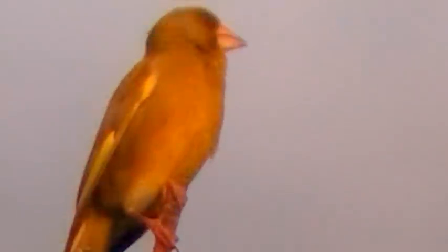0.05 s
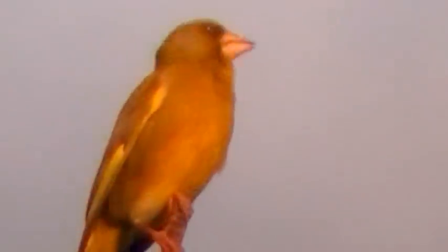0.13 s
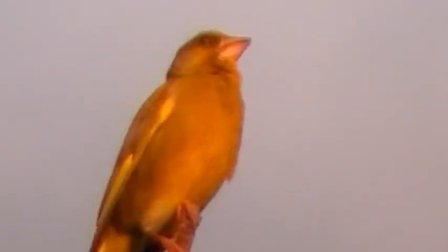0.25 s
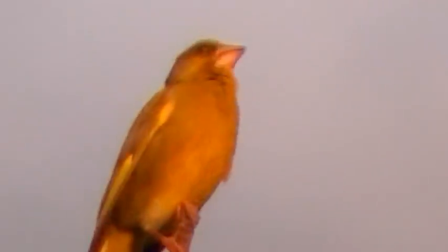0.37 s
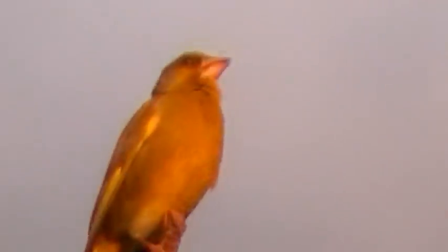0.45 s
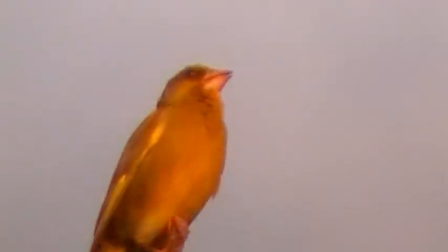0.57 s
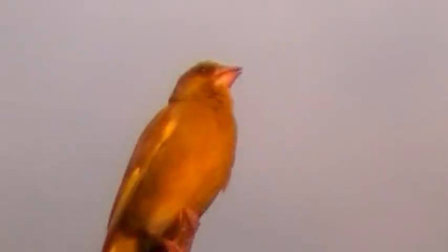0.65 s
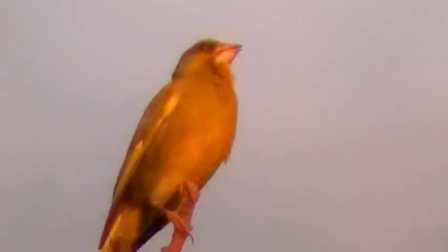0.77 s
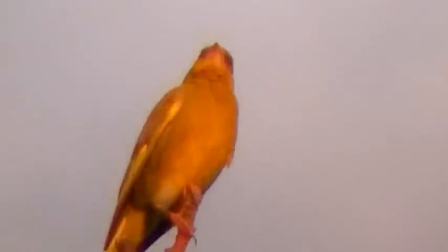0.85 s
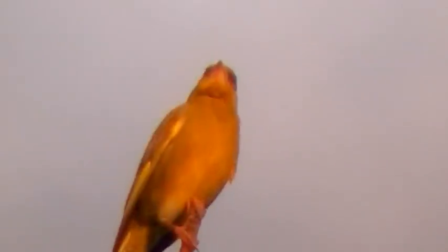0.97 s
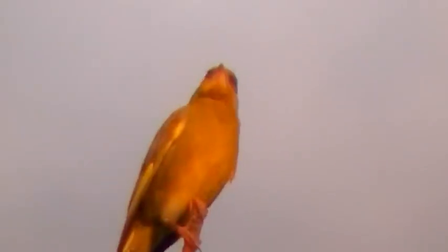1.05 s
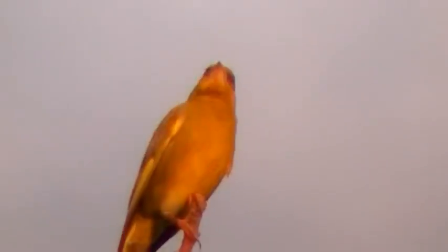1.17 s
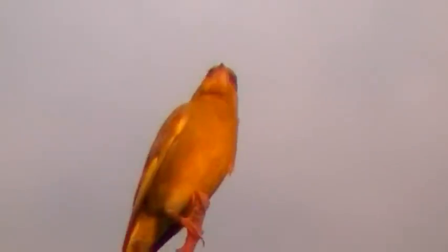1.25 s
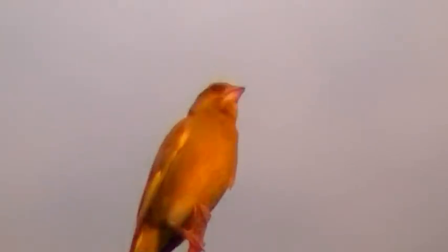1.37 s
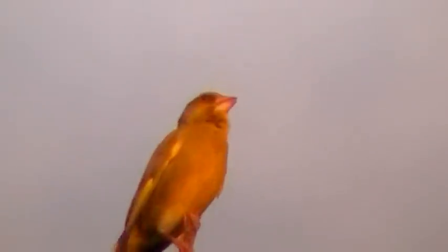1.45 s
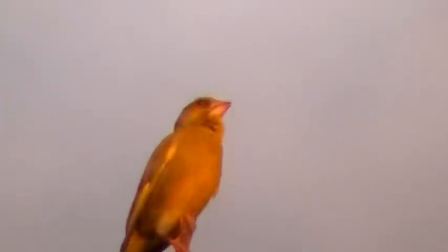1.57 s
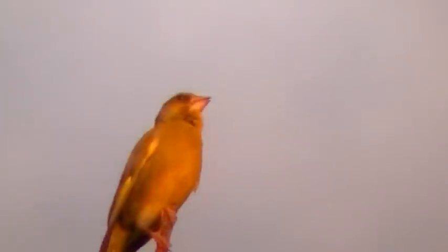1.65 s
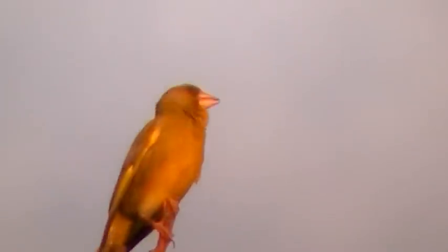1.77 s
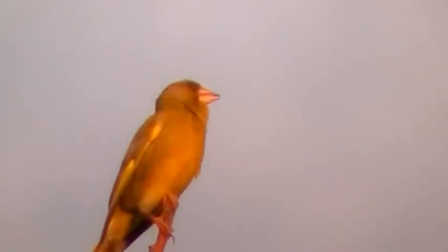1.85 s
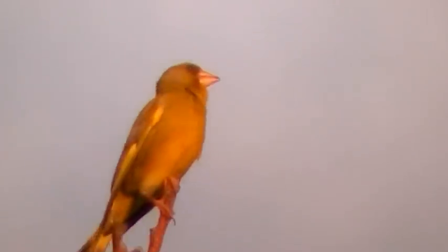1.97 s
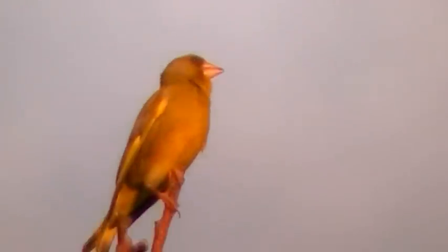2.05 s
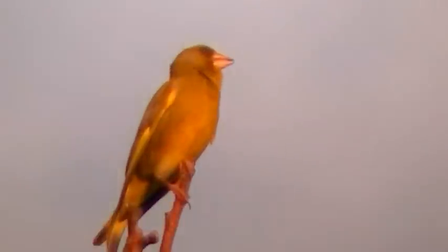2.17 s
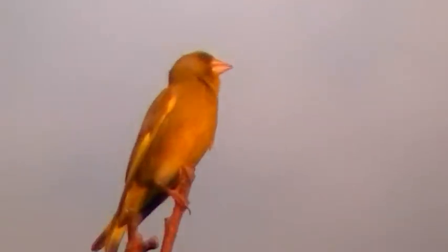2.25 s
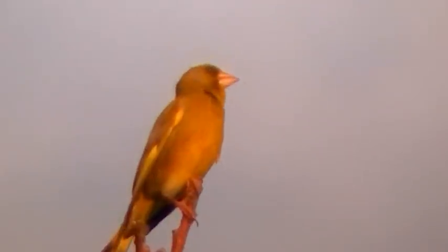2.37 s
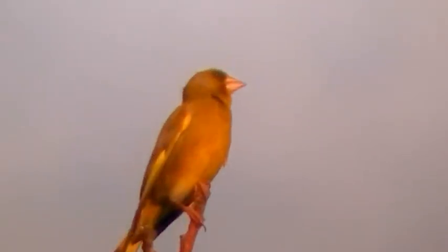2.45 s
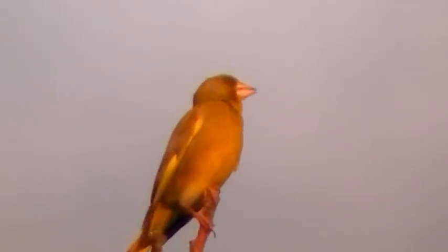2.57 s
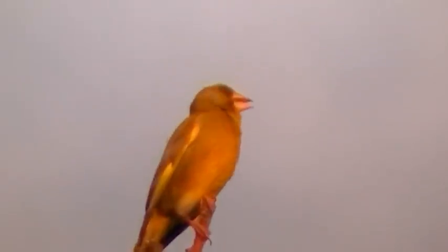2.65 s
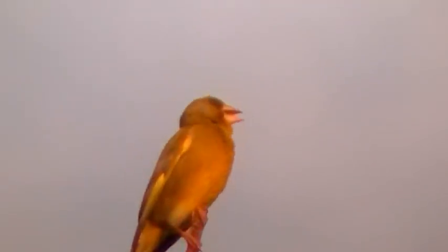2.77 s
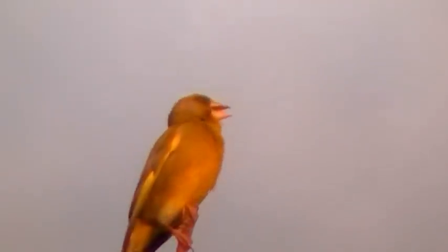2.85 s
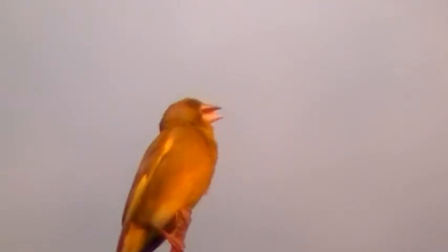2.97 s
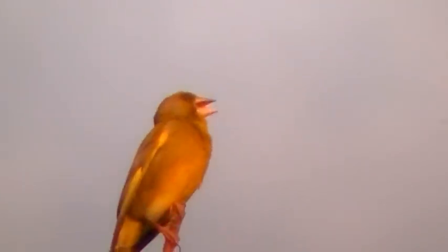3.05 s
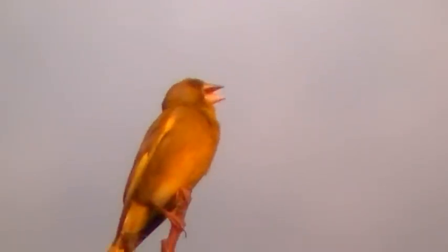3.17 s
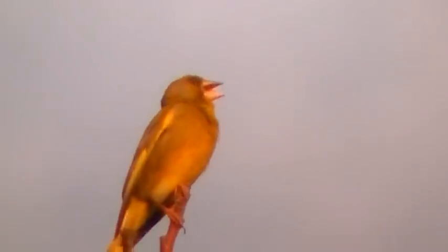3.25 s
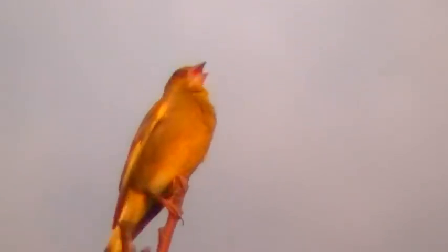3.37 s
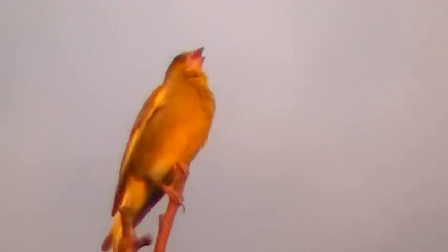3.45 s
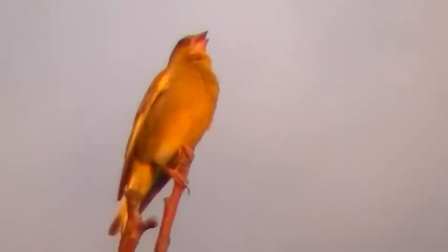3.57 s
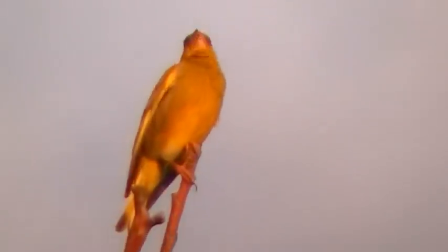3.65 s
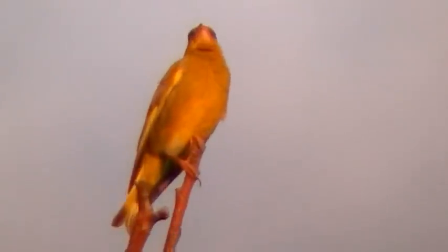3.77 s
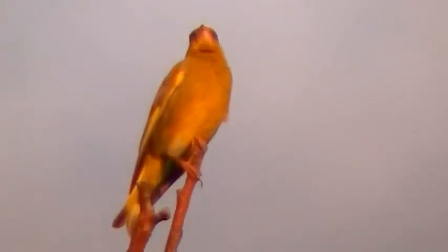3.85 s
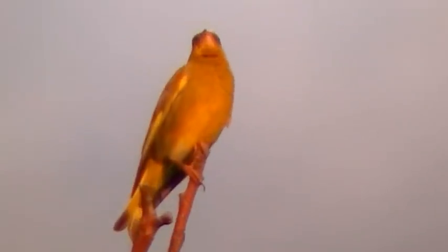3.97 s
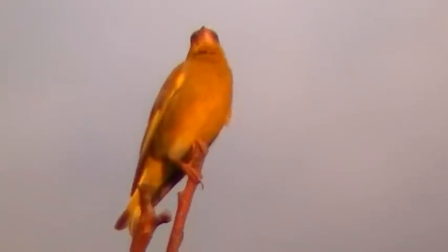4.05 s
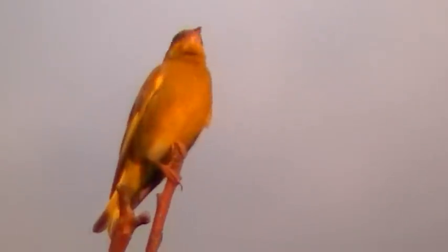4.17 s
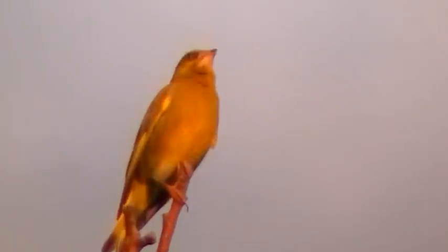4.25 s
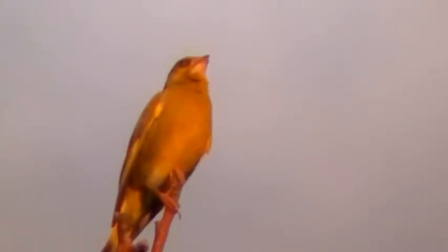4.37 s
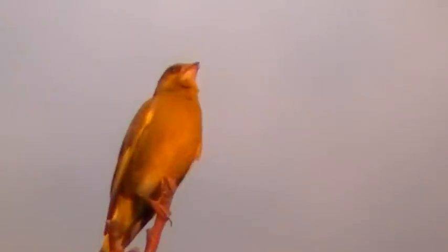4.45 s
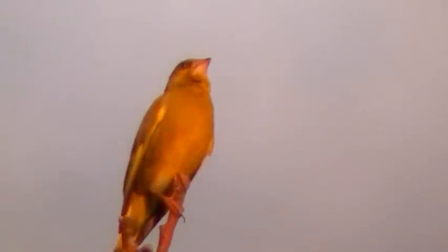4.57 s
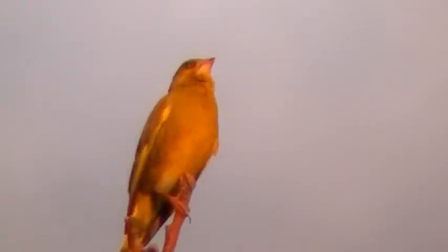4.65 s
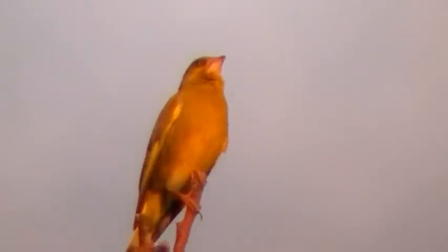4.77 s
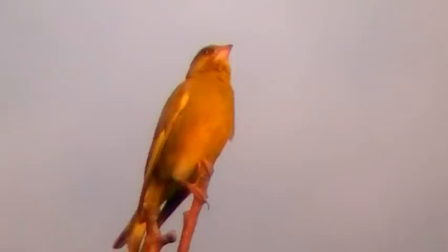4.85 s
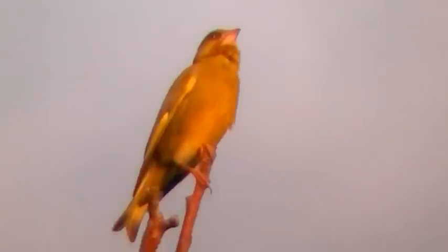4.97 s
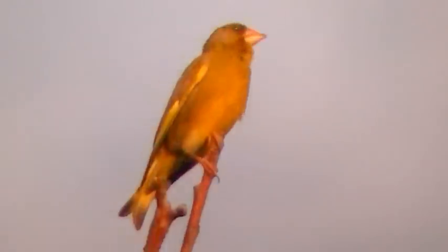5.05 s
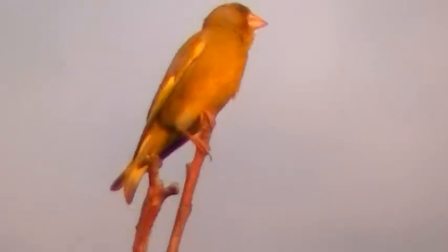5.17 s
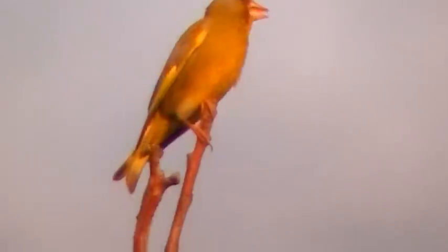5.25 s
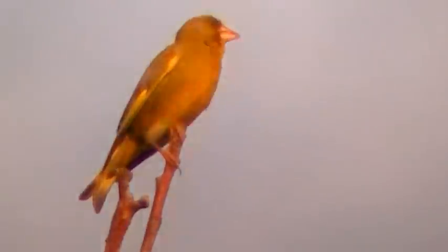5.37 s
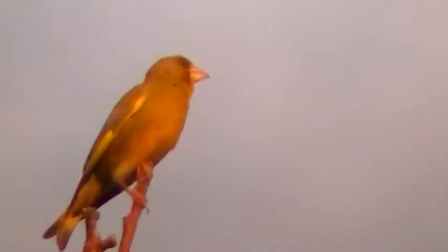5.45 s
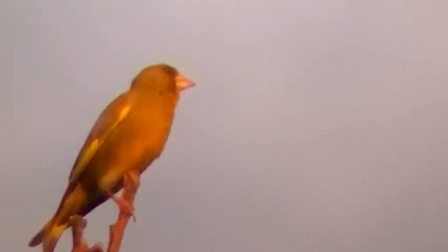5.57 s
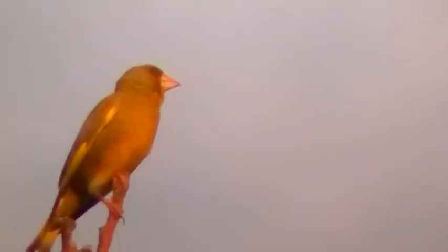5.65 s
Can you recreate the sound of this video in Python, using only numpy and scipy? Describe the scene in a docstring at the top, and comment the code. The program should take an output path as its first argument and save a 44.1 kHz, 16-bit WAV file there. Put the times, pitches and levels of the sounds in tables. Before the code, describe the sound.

A greenfinch close to the microphone gives thirteen quick chirped notes, rests, then ten longer falling whistles with a single sharp tick among them. A brief high whistle breaks into a one-second raspy, buzzing wheeze. Later come eight plunging notes, gently fading. Quick reflections and a short scattered tail surround the song. Behind are a quiet wide outdoor rush, a distant murmur swelling mid-way, and far-off rough bird chatter towards the end.

```python
"""A faint outdoor rush is heard first; then a greenfinch sings three trills of falling notes and one long wheeze.
Its notes are gliding whistles with weak overtones; the wheeze is a sinking whistle warbled about 119 times a second.
Nearby surfaces throw the song back within milliseconds, as delayed copies and a fading scatter of noise.
Far-off chatter is made of short rough whistles, a dry click is one pulse with a faint ring, and a second bird's
thin call leaps up and slides down. The rush and its distant swells are shaped noise."""
import sys
import numpy as np
from scipy import signal
from scipy.fft import rfft, irfft
from scipy.io import wavfile

SR = 44100
rng = np.random.default_rng(int(sys.argv[2]) if len(sys.argv) > 2 else 0)


def bounce(signal):
    """Save signal as a 16-bit WAV file at the path given by the first command-line argument."""
    frames = np.transpose(np.atleast_2d(signal))
    limited = np.clip(frames, -1, 1)
    pcm = np.round(limited * 32767).astype(np.int16)
    wavfile.write(sys.argv[1], SR, pcm)


N = 252252  # length of the scene in samples
# Levels in dB are relative: they add up along the way to the final sound.


def undb(db):
    """Turn decibels into a plain gain."""
    return 10 ** (np.asarray(db) / 20)


def unit(x):
    """Scale a sound to an average (rms) strength of 1."""
    return x / np.sqrt(np.mean(x ** 2))


def gain_at(hz, points):
    """Gain at each frequency of a (frequency [Hz], level [dB]) curve, joined on a log-frequency axis."""
    f, db = np.transpose(points)
    return undb(np.interp(np.log(np.maximum(hz, 1)), np.log(f), db))


def noise(points, size):
    """Random hiss of rms 1, coloured by a (frequency [Hz], level [dB]) curve."""
    spectrum = rfft(rng.standard_normal(size))
    colour = gain_at(np.fft.rfftfreq(size, 1 / SR), points)
    return unit(irfft(spectrum * colour, size))


def wander(rate, size):
    """Chance drift around 0: a new random value `rate` times a second, joined by straight lines."""
    steps = np.arange(size) * rate / SR
    return np.interp(steps, np.arange(4096), rng.standard_normal(4096))


def trace(rows):
    """Start time of a curve table, and its other columns drawn out sample by sample."""
    s, *columns = np.transpose(rows)
    t = np.arange(s[0], s[-1], 1 / SR)
    return s[0], [np.interp(t, s, c) for c in columns]


def add(track, s, x):
    """Mix sound x into the track from time s, in seconds."""
    i = max(int(s * SR), 0)
    track[i:i + len(x)] += x[:max(N - i, 0)]


# How strongly the throat and open beak pass the overtones: (frequency [Hz], level [dB])
THROAT_FILTER = [(5000, -16), (5800, -26.5), (6400, -20), (7100, -25), (7800, -18), (8900, -25),
                 (9800, -23.5), (12000, -24.5), (13200, -25), (14200, -35), (15500, -44)]


def syrinx(hz, db, overtone_db, throb_db=0, fourth_db=-3):
    """The bird's voice box: a nearly pure whistle that may throb, with weak overtones let through by the throat."""
    phase = 2 * np.pi * np.cumsum(hz) / SR
    tone = undb(throb_db) * np.sin(phase)  # only the fundamental throbs
    for k, db_k in zip(range(2, 5), (0, -1, fourth_db)):
        audible = k * hz < SR / 2
        strength = undb(overtone_db + db_k) * gain_at(k * hz, THROAT_FILTER) * audible
        tone += strength * np.sin(k * phase)
    fade = signal.windows.tukey(len(hz), min(0.0038 * SR / len(hz), 1))  # both end fades together: 3.8 ms
    return np.sqrt(2) * tone * undb(db) * fade


# Colour of the outdoor rush, alike on both sides: (frequency [Hz], level [dB per Hz])
RUSH_MID = [(15, -37), (25, -15.5), (133, -10), (183, -6.5), (253, -7), (322, -6.5), (389, -5.5),
            (457, -3.5), (871, -7), (2060, -11), (2630, -13), (3170, -12.5), (4870, -20), (5730, -19),
            (15500, -37)]
# Colour of the rush that is opposite on the two sides: (frequency [Hz], level [dB per Hz])
RUSH_SIDE = [(15, -16), (25, -18), (183, -3.5), (305, -6), (399, -5.5), (582, -7.5), (871, -12),
             (1050, -12), (1170, -13.5), (1490, -14), (3440, -22), (4500, -28), (8130, -31), (10100, -32.5),
             (15500, -46)]
RUSH_MID_DB, RUSH_SIDE_DB = -61.5, -57.5
# Swells of the distant murmur:
# (peak time [s], rise time [s], fall time [s], middle-range level [dB], low rumble level [dB])
MURMUR_SWELLS = [(3.201, 0.4, 0.89, -58.5, -81), (5.48, 0.13, 0.096, -56, -61)]
MURMUR_DB, RUMBLE_DB = -69, -78  # the steady part, below the swells


def outdoors(flicker_db=1.0, hiss_db=-75):
    """Open air: a flickering rush of noise, wide in the bass, with distant swells and a thin high hiss."""
    mid = undb(RUSH_MID_DB + flicker_db * wander(4.9, N)) * noise(RUSH_MID, N)
    side = undb(RUSH_SIDE_DB + flicker_db * wander(5.03, N)) * noise(RUSH_SIDE, N)
    t = np.arange(N) / SR
    middle, low = undb(MURMUR_DB), undb(RUMBLE_DB)
    for s, rise, fall, middle_db, low_db in MURMUR_SWELLS:
        swell = np.exp(-((t - s) / np.where(t < s, rise, fall)) ** 2)
        # hypot adds the strengths as energies
        middle = np.hypot(middle, undb(middle_db) * swell)
        low = np.hypot(low, undb(low_db) * swell)
    murmur_colour = [(100, -10), (450, -13), (850, 5.0), (1400, -3.5), (2500, -58), (8000, -64)]
    rumble_colour = [(60, -38), (230, -12.5), (500, -27), (3000, -56)]
    # separate noise for the left and right side
    murmur = np.array([noise(murmur_colour, N) for _ in range(2)])
    rumble = np.array([noise(rumble_colour, N) for _ in range(2)])
    hiss = undb(hiss_db) * noise([(4300, -9), (4750, 8), (4950, 6.5), (5250, -36)], N)
    return mid + side * np.array([[1], [-1]]) + middle * murmur + low * rumble + hiss


def trill(shape, notes, overtone_db, fourth_db, effort=0.24):
    """One falling note repeated, never quite alike; a louder note is richer in overtones."""
    out = np.zeros(N)
    _, (hz, db) = trace(shape)
    loudest = max(row[2] for row in notes)
    for s, ratio, note_db in notes:
        pitch = hz * ratio * (1 + .005 * wander(200, len(hz)))
        richness_db = overtone_db + effort * (note_db - loudest)
        add(out, s, syrinx(pitch, db + note_db, richness_db, fourth_db=fourth_db))
    return out


# Shape of the low note: (time into the note [s], pitch [Hz] before the ratio below, level [dB])
PIP_SHAPE = [(0, 3550, -16), (.004, 3640, -5.5), (.008, 3240, 1), (.012, 2900, -7), (.018, 2790, -11.5)]
# Where it is sung: (time [s], pitch ratio, level [dB])
PIP_NOTES = [(.094, 1.023, -38.5), (1.4517, 0.96, -32), (3.782, 0.95, -50), (4.018, 0.93, -48.5),
             (4.107, 0.98, -36.5)]


def pips():
    """Soft, low notes that lead into the trills, from the same whistling voice."""
    return trill(PIP_SHAPE, PIP_NOTES, overtone_db=-1, fourth_db=-9)


def tail(t60, onset_s, treble_db, side_db):
    """Scattered sound: noise that builds up and dies by 60 dB in t60 seconds, a little different on each side."""
    t = np.arange(SR) / SR
    fall = np.exp(-np.log(1000) * t / t60) * np.clip(t / onset_s, 0, 1) ** 2
    colour = [(500, 0), (4800, 0), (7500, treble_db), (14000, 2 * treble_db)]
    mid, side = (noise(colour, SR) * fall for _ in range(2))
    pair = mid + undb(side_db) * side * np.array([[1], [-1]])
    song_band = slice(2500, 4500)  # Hz, as the noise lasts one second
    # average gain of 1 where the song lies
    return pair / np.sqrt(np.mean(abs(rfft(pair)[:, song_band]) ** 2))


# Echoes off nearby surfaces: (delay time [s], level [dB])
NEAR_ECHOES = [(.00234, -4), (.0036, -4), (.00479, -7), (.00684, 5), (.00789, -3), (.01031, -10),
               (.01321, -9), (.01598, -9), (.01901, -10), (.02123, -13), (.02533, -11)]


def surroundings(x, scatter_db, far_db, dull_hz=6500):
    """Direct sound, then delayed copies duller in the treble, a quick scatter and a longer tail."""
    hz = np.fft.rfftfreq(SR, 1 / SR)
    # each delay is a turn of phase that grows with frequency
    near = sum(undb(db) * np.exp(-2j * np.pi * hz * s) for s, db in NEAR_ECHOES)
    near = near / (1 + (hz / dull_hz) ** 4)
    scatter = tail(t60=0.19, onset_s=0.008, treble_db=-5.0, side_db=-8.0)
    far = tail(t60=0.33, onset_s=0.071, treble_db=-35.0, side_db=-10.0)
    response = irfft(1 + near) + undb(scatter_db) * scatter + undb(far_db) * far
    return undb(-6.5) * signal.fftconvolve(x[None], response, axes=1)[:, :N]


def phrase(starts, peak_s, peak_db, fade_db_per_s, first_db=0, sharp=0, settle_s=1):
    """Notes (time [s], pitch ratio, level [dB]) that may start soft or sharp and get softer away from a peak."""
    s = np.array(starts)
    ratio = 1 + sharp * np.maximum(1 - (s - s[0]) / settle_s, 0)
    db = peak_db - fade_db_per_s * abs(s - peak_s) + first_db * (s == s[0])
    return np.transpose([s, ratio, db])


# Shape of a first-trill note: (time into the note [s], pitch [Hz], level [dB])
CHIP_SHAPE = [(0, 4330, -1.5), (.003, 3930, -2), (.006, 3520, -1), (.0087, 3130, -2.5), (.011, 2920, -6),
              (.016, 2860, -16)]
# When its notes start: (time [s])
CHIP_STARTS = [.1537, .217, .281, .345, .4114, .472, .536, .599, .662, .727, .792, .857, .9245]


def chips():
    """First trill: short whistles falling in pitch, swelling to a peak and easing off."""
    notes = phrase(CHIP_STARTS, peak_s=0.67, peak_db=-29.0, fade_db_per_s=7, first_db=-2.5)
    return trill(CHIP_SHAPE, notes, overtone_db=0.5, fourth_db=-2.5)


def far_call(length, hz, db, rough, rasp_db=3):
    """One call of a distant bird: a whistle unsteady in pitch and level."""
    size = int(length * SR)
    pitch = hz * (1 + rough * wander(1100, size))
    call = syrinx(pitch, db + rasp_db * wander(284, size), -6)
    return call * signal.windows.tukey(size, .5)


# Bouts of far-off chirps: (start time [s], end time [s], rate [chirps per s], chirp length [s],
# middle pitch [Hz], middle level [dB], roughness [share of the pitch])
CHIRP_BOUTS = [(1.248, 1.54, 22, 0.019, 2138, -65.5, 0.013), (2.297, 2.94, 10.6, 0.029, 2432, -64, .15),
               (4.03, 4.6, 2.55, 0.065, 1337, -65.5, 0.075), (5.01, 5.4, 3.8, 0.023, 1390, -59.5, 0.068),
               (5.027, 5.3, 13.5, 0.036, 2673, -61, 0.118)]
# Harsh calls of a distant bird: (time [s], length [s], level [dB])
HARSH_CALLS = [(4.954, 0.1, -57), (5.123, 0.11, -58), (5.354, 0.12, -56.5), (5.526, .11, -57)]
HARSH_HZ, HARSH_ROUGH = 2305, 0.1556  # middle pitch; roughness as a share of it


def chatter(pitch_spread=0.019, spread_db=2.0):
    """Distant birds: bouts of whistled chirps that each differ a little, and a few calls made harsh by jitter."""
    out = np.zeros(N)
    for s, length, db in HARSH_CALLS:
        add(out, s, far_call(length, HARSH_HZ, db, HARSH_ROUGH))
    for start, end, rate, length, hz, db, rough in CHIRP_BOUTS:
        for s in np.arange(start, end, 1 / rate):
            higher, louder = rng.standard_normal(2)
            pitch = hz * (1 + pitch_spread * higher)
            add(out, s, far_call(length, pitch, db + spread_db * louder, rough))
    return out


# Shape of a second-trill note: (time into the note [s], pitch [Hz] once settled, level [dB])
TEW_SHAPE = [(0, 4290, -9.5), (.004, 3635, -3.5), (.007, 3403, -1.5), (.015, 3414, -6), (.020, 3100, -1.5),
             (.0235, 2912, -10), (.026, 2650, -13)]
# When its notes start: (time [s])
TEW_STARTS = [1.5167, 1.5913, 1.665, 1.7431, 1.819, 1.8935, 1.97, 2.0575, 2.1446, 2.2306]


def tews():
    """Second trill: longer falling whistles that begin sharp and settle in pitch."""
    notes = phrase(TEW_STARTS, peak_s=2.05, peak_db=-34, fade_db_per_s=3.0, sharp=0.1123, settle_s=.31)
    return trill(TEW_SHAPE, notes, overtone_db=1.5, fourth_db=-14)


# Colour of the click: (frequency [Hz], level [dB])
CLICK_SPECTRUM = [(200, -22), (500, -16), (900, 0), (1800, 2.5), (3200, -6), (5200, -23), (6500, -17),
                  (8600, -20), (10000, -30), (15000, -52)]
CLICK_S, CLICK_DB = 1.7868, -25  # time; peak level of the pulse


def click(ring_db=-30, ring_t60=0.1):
    """A dry tick close to the microphone: one pulse with its energy at the front, and a faint dying ring."""
    size = 2048
    # keeping half the cepstrum (spectrum of the log spectrum) moves the pulse's energy to its start
    cepstrum = irfft(np.log(gain_at(np.fft.rfftfreq(size, 1 / SR), CLICK_SPECTRUM)))
    pulse = irfft(np.exp(rfft(2 * cepstrum[:size // 2], size)))
    decay = np.exp(-np.log(1000) * np.arange(size) / SR / ring_t60)
    ring = noise(CLICK_SPECTRUM, size) * undb(ring_db) * decay
    out = np.zeros(N)
    add(out, CLICK_S, undb(CLICK_DB) * (pulse / abs(pulse).max() + ring))
    return out


# The clear whistle, a soft touch and then an accent: (time [s], middle pitch [Hz], level [dB])
WHISTLE_CURVE = [(2.66, 5634, -63), (2.667, 5626, -48), (2.684, 5600, -61), (2.694, 5496, -28.5),
                 (2.718, 5410, -53)]


def whistle(overtone_db=-9, rough=0.01):
    """The clear high note out of which the wheeze breaks: a slightly unsteady whistle."""
    out = np.zeros(N)
    s, (hz, db) = trace(WHISTLE_CURVE)
    pitch = hz * (1 + rough * wander(420, len(hz)))
    add(out, s, syrinx(pitch, db, overtone_db))
    return out


# The effort behind the wheeze: (time [s], level [dB] before an overall trim)
EFFORT_CURVE = [(2.72, -47), (2.754, -44), (2.784, -44.5), (2.862, -44.5), (2.906, -40), (3.076, -36),
                (3.548, -33), (3.71, -47.5), (3.74, -59)]
# its middle pitch sags from a high start toward a resting pitch, then droops as the note runs out
WHEEZE_START_HZ, WHEEZE_REST_HZ, WHEEZE_SAG_S = 5000, 3209, .35
DROOP_S, DROOP_HZ_PER_S = .15, 2700
WARBLE_HZ = 118.8  # average rate
# the warble opens from half to full depth (share of the pitch) and is ragged until it settles
WARBLE_DEPTH, WARBLE_OPEN_S, WARBLE_SETTLE_S = 0.11, 0.098, 0.53
# the overtones start weak; once it has settled they are strongest in the troughs of the warble
EARLY_OVERTONE_DB, OVERTONE_RISE_S, TROUGH_DB = -4, 0.31, 2


def wheeze(level_db=-3, overtone_db=3, peaked=0.099, throb_db=4.5, early_throb_db=2.0, flutter_db=1.8,
           noise_band_db=-27):
    """A sinking whistle swung so fast that it buzzes, louder on the crests, with a faint band of noise added
    around 2.8-4 kHz."""
    out = np.zeros(N)
    s, (db,) = trace(EFFORT_CURVE)
    size = len(db)
    t = np.arange(size) / SR
    hz = WHEEZE_REST_HZ + (WHEEZE_START_HZ - WHEEZE_REST_HZ) * np.exp(-t / WHEEZE_SAG_S)
    hz = hz - DROOP_HZ_PER_S * np.maximum(t - t[-1] + DROOP_S, 0)

    opening = 1 - .5 * np.exp(-t / WARBLE_OPEN_S)
    unsettled = np.clip(1 - t / WARBLE_SETTLE_S, 0, 1)
    rate_jitter = .008 + .05 * unsettled
    depth_jitter = .07
    rough = .006 + .03 * unsettled
    turn = 2 * np.pi * np.cumsum(WARBLE_HZ * (1 + rate_jitter * wander(98.6, size))) / SR
    swing = np.cos(turn) + peaked * np.cos(2 * turn)  # sharper crests, rounder troughs
    warble = WARBLE_DEPTH * swing * (1 + depth_jitter * wander(110, size))
    pitch = hz * (1 + opening * (warble + rough * wander(700, size)))

    throb = (throb_db + early_throb_db * unsettled) * swing * opening
    early = EARLY_OVERTONE_DB * np.maximum(1 - t / OVERTONE_RISE_S, 0)
    overtones = overtone_db + early - TROUGH_DB * swing * (1 - unsettled)
    loudness = db + level_db + flutter_db * wander(89.5, size)
    add(out, s, syrinx(pitch, loudness, overtones, throb, fourth_db=-5.5))
    noise_band = noise([(2400, -58), (2800, 5), (3100, 0), (4000, 3), (5000, -44)], size)
    add(out, s, undb(db + noise_band_db) * noise_band)
    return out


# Shape of a third-trill note: (time into the note [s], pitch [Hz] once settled, level [dB])
CHOW_SHAPE = [(0, 6190, -9.5), (.004, 4430, -5.5), (.007, 3800, -0.5), (.011, 3440, -4), (.018, 3374, -0.5),
              (.023, 3055, 1.5), (.028, 2650, -11.5), (.033, 2450, -19.5)]
# When its notes start: (time [s])
CHOW_STARTS = [4.175, 4.2586, 4.3444, 4.429, 4.514, 4.5986, 4.682, 4.7747]


def chows():
    """Third trill: whistles that plunge from high up, begin a little sharp and slowly get softer."""
    notes = phrase(CHOW_STARTS, peak_s=4.16, peak_db=-32.0, fade_db_per_s=3.5, first_db=-1.6,
                   sharp=0.0388, settle_s=0.39)
    return trill(CHOW_SHAPE, notes, overtone_db=-0.5, fourth_db=-3)


# The second bird's call: (time [s], middle pitch [Hz], level [dB])
THIN_CALL_CURVE = [(5.319, 5810, -38), (5.322, 6630, -44), (5.328, 7300, -46), (5.34, 7040, -54),
                   (5.353, 6600, -54), (5.366, 5640, -43), (5.378, 5250, -35.5), (5.39, 5280, -51.5),
                   (5.398, 5330, -50)]


def second_bird(rough=0.025, overtone_db=-7, quaver=0.05, quaver_hz=260):
    """A thin whistle that leaps up and slides down, its pitch quavering more and more."""
    out = np.zeros(N)
    s, (hz, db) = trace(THIN_CALL_CURVE)
    size = len(hz)
    shake = quaver * np.sin(2 * np.pi * quaver_hz * np.arange(size) / SR) + rough * wander(704, size)
    growth = np.linspace(.15, 1.2, size)
    add(out, s, syrinx(hz * (1 + growth * shake), db, overtone_db))
    return out


def scene():
    """The finch near by, other birds further off (more tail), the click and the open air, added together."""
    finch = pips() + chips() + tews() + whistle() + wheeze() + chows()
    song = surroundings(finch, scatter_db=2.5, far_db=-9.0)
    others = surroundings(chatter() + second_bird(), scatter_db=3.5, far_db=1.0)
    return outdoors() + song + others + click()


TOP_HZ = 15700


def record(dry):
    """The recorder cuts the top: a steep low-pass filter at TOP_HZ."""
    top_cut = signal.ellip(10, .2, 70, TOP_HZ, fs=SR, output="sos")
    return signal.sosfilt(top_cut, dry)


dry = scene()
out = record(dry)
bounce(out)
```